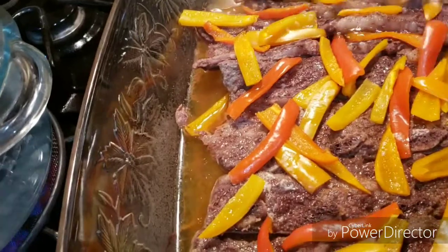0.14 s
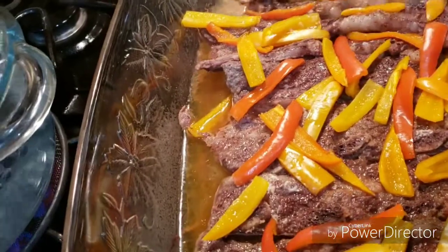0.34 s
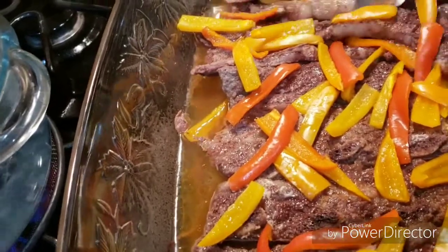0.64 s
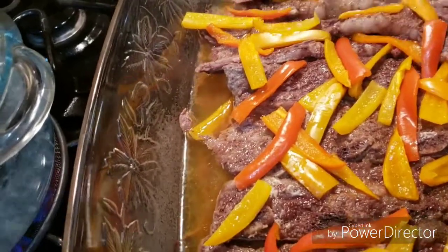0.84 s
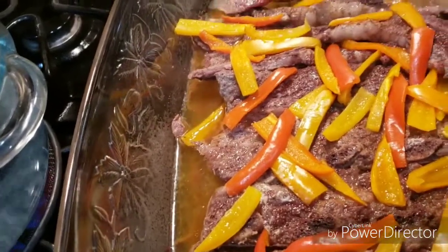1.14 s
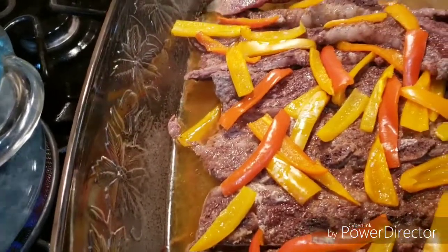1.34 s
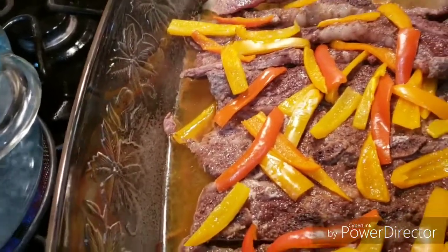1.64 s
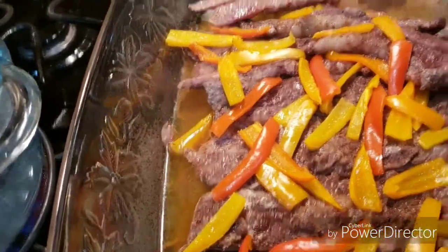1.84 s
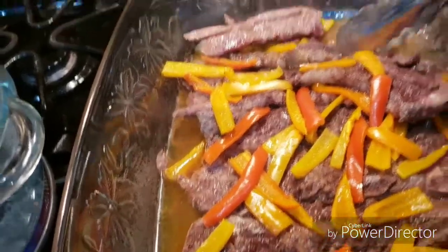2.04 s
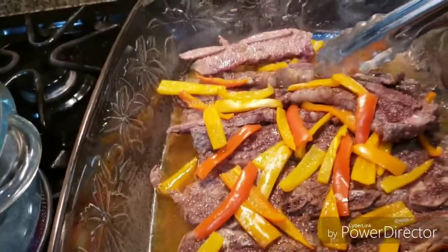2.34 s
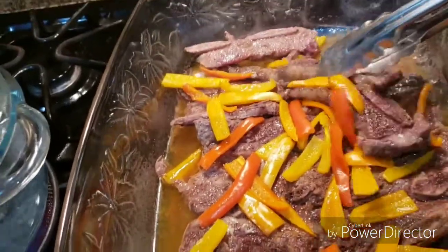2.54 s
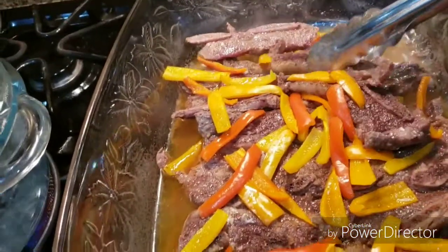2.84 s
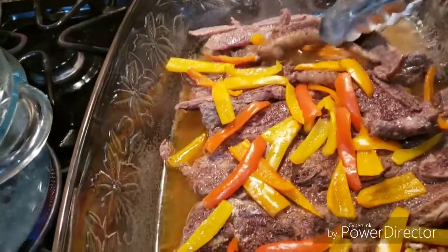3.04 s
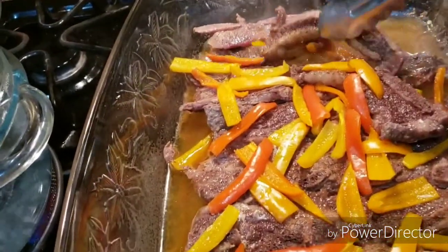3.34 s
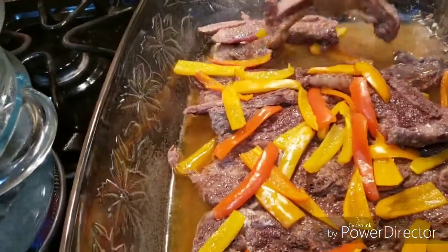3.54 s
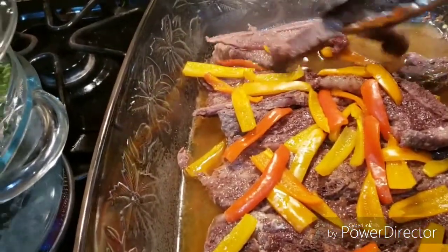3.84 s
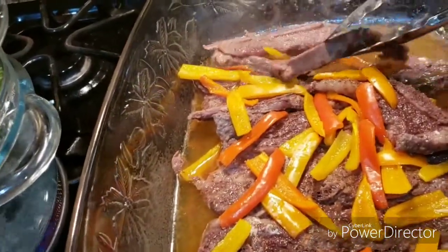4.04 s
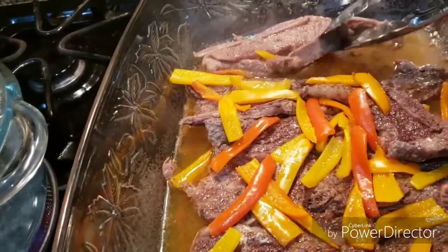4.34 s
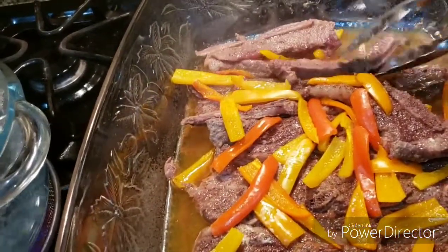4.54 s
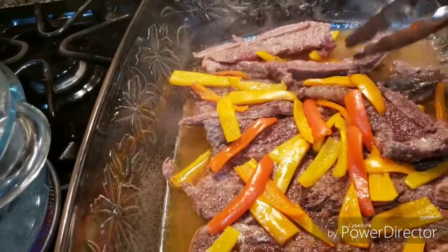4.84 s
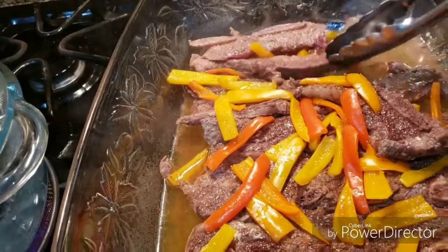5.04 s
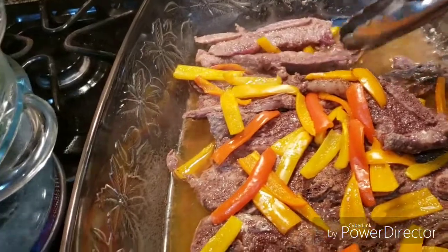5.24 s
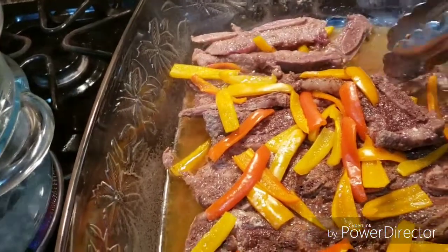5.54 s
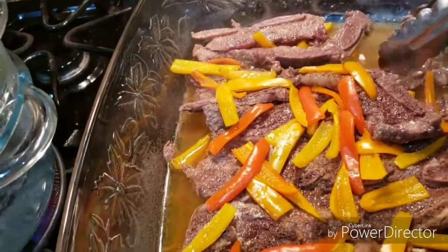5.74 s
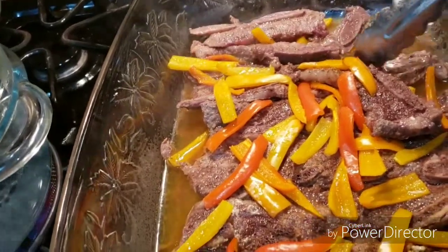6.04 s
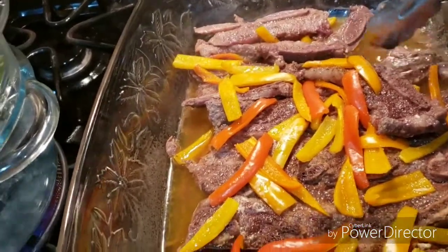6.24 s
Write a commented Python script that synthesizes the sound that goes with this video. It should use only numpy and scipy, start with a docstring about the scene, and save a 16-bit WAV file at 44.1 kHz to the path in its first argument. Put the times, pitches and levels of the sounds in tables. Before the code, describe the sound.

Steel tongs clink sharply on a glass baking dish while meat squishes in softly fizzing juice, over a low steady fan hum in a kitchen.

```python
"""Steel tongs knock and click on a glass baking dish of hot meat and peppers, on a kitchen stove.
The dish rings briefly, the tongs scrape along it, and the meat squishes in its softly fizzing juice.
An appliance fan hums throughout; a small kitchen answers each click.
Blows are noise bursts plus dying tones, scrapes and juice are many tiny pops of noise,
and the fan is wavering tones in coloured noise."""
import sys
import numpy as np
from scipy import signal
from scipy.fft import rfft, irfft
from scipy.io import wavfile
from scipy.ndimage import uniform_filter1d

SR = 44100
rng = np.random.default_rng(int(sys.argv[2]) if len(sys.argv) > 2 else 0)


def store_wav(level_fs):
    """Save 16-bit WAV to argv[1]."""
    pcm = np.round(np.clip(np.atleast_2d(level_fs), -1, 1) * 32767)
    wavfile.write(sys.argv[1], SR, pcm.T.astype(np.int16))


N = 281799
TIME, HZ = np.arange(N) / SR, np.fft.rfftfreq(N, 1 / SR)
RING = np.arange(SR // 2) / SR  # time since a blow [s]

# ringing tones of the glass dish: (pitch [Hz], relative level [dB], time to fall 60 dB [s])
GLASS_MODES = [(484, -10, .1), (700, -13, .09), (897, -5, .17), (985, -5, .07), (1180, -8, .04),
               (1290, -6, .05), (1545, -5, .045), (1830, -8, .06), (2035, -3, .06), (2325, 1, .07),
               (2488, -2.5, .09), (2867, 3.5, .085), (2920, 0, .08), (3070, -4, .07), (3256, -3, .045),
               (3460, -5, .06), (4440, -3, .05), (4724, -5, .09), (5150, -9, .05), (5495, -5.5, .11),
               (6140, -7, .05), (6745, -1, .06), (7280, -5, .06), (7450, -7, .08), (9630, -10, .06),
               (10400, -12, .06), (12000, -11, .06)]
# steady fizz of the hot juice: (time [s], level [dB])
FIZZ_LEVEL = [(0, -59.5), (1.05, -63.5), (2.2, -57.5), (3.3, -61), (3.8, -58.5), (6.39, -57)]


def amp(db):
    """Turns decibels into a gain."""
    return 10 ** (np.asarray(db) / 20)


def evened(x):
    """Scales a sound to an rms of 1 over all its channels."""
    return x / np.sqrt(np.mean(x ** 2) + 1e-20)


def unit(x):
    """Scales each channel to an energy of 1."""
    return x / np.sqrt(np.sum(x ** 2, -1, keepdims=True) + 1e-20)


def read(points, hz):
    """Reads a table of (pitch, value) along a logarithmic pitch scale."""
    f, value = np.transpose(points)
    return np.interp(np.log(hz + 1), np.log(f + 1), value)


def pan(db):
    """Left and right gains that differ by db; a positive value leans left."""
    return amp(np.array([[db], [-db]]) / 2)


def add(mix, start_s, sound):
    """Adds a sound into the mix at its start time, cut off at the end of the mix."""
    part = mix[:, max(round(start_s * SR), 0):][:, :sound.shape[1]]
    part += sound[:, :part.shape[1]]


def noise(colour, size, tilt_db=0):
    """Two unrelated channels of coloured noise; tilt is in dB per octave and stays flat below 500 Hz."""
    hz = np.fft.rfftfreq(size, 1 / SR)
    octaves = np.log2(np.maximum(hz, 500) / 1000)
    gain = amp(read(colour, hz) + tilt_db * octaves)
    white = rng.standard_normal((2, size))
    return evened(irfft(rfft(white) * gain, size))


def drift(rate_hz):
    """Slow random wandering with an rms of 1."""
    smooth = np.exp(-(HZ / rate_hz) ** 2)
    return evened(irfft(rfft(rng.standard_normal(N)) * smooth, N))


def crackle(colour, per_s, spread_db):
    """Tiny pops of uneven size, each a few milliseconds of dying noise."""
    size = amp(spread_db * np.minimum(rng.exponential(1, N), 4))
    size = size * (rng.random(N) < per_s / SR)
    decay = np.exp(-1 / (.0018 * SR))
    power = signal.lfilter([1], [1, -decay], size ** 2)
    return evened(noise(colour, N) * np.sqrt(power))


def patchy(x, depth_db, width_hz, hold_s):
    """Lets the colour of a sound shift at random, in patches of time and pitch."""
    hz, t, z = signal.stft(x, SR, nperseg=512)
    field = rng.standard_normal(z.shape[1:])
    for axis, size in enumerate([width_hz / hz[1], hold_s / t[1]]):
        size = max(round(size), 1)
        field = uniform_filter1d(field, size, axis)
        field = uniform_filter1d(field, size, axis)
    shifted = z * amp(depth_db * evened(field))
    return evened(signal.istft(shifted, SR, nperseg=512)[1][:, :N])


def stroke(start_s, length_s, db, attack_s, sag_db_per_s, t60_s):
    """Gain of a gesture that rises, sags while it is held, and dies away."""
    t = np.maximum(TIME - start_s, 0)
    release_db = 60 * np.maximum(t - length_s, 0) / t60_s
    return (1 - np.exp(-t / attack_s)) * amp(db - sag_db_per_s * t - release_db)


def ring(modes, tilt_db, favoured_hz=0, split=0):
    """Dying tones; the point of contact favours those near one pitch, and all vary from blow to blow."""
    tilt_from_hz, strike_spread_db = 810, 1.2
    favour_db, favour_width_hz = 11, 180
    hz, db, t60_s = np.transpose(modes)[:, :, None]
    db = db + tilt_db * np.log2(np.maximum(hz / tilt_from_hz, 1))
    db = db + strike_spread_db * rng.standard_normal(hz.shape)
    hz = hz * (1 + split * rng.choice([-1, 1], hz.shape))
    db = db + favour_db * np.exp(-((hz - favoured_hz) / favour_width_hz) ** 2)
    # each tone is a quarter turn apart in left and right, the leading side drawn at random: it sounds wide
    quarter_turn = np.array([1, -1])[:, None, None] * rng.choice([-1, 1], hz.shape) * np.pi / 4
    phase = 2 * np.pi * (hz * RING + rng.random(hz.shape)) + quarter_turn
    return unit((amp(db - 60 * RING / t60_s) * np.sin(phase)).sum(1))


def clinks():
    """Each contact sets off a dull clack and a ring in the glass, and a bright snap in both arms of the tongs."""
    # contacts: (time [s], dull clack of the dish [dB], bright snap of the tongs [dB], glass ring [dB],
    # tilt [dB per octave], left-right difference [dB], favoured pitch of the tongs [Hz])
    contacts = [(0.0308, -29, -13, -32, 0, 3, 6500), (0.3828, -6, -23, -6, 4.5, 0, 7260),
                (0.3877, -9.5, -18, -2.5, 0, -5, 12000), (0.4845, -15.5, -12.5, -11.5, 2, 3, 5820),
                (1.189, -39, -53, -23, -2, 4, 7000), (1.8472, -13.5, -33.5, -16.5, -4, 8, 5000),
                (2.0251, -10, 2, -12.5, 1.5, 1, 7100), (2.1675, -13.5, -4.5, -14.5, 2, 0.5, 5560),
                (2.3308, -24.5, -25, -25.5, -3.5, -2, 5600), (3.866, -30.5, -36, -31.5, 6.5, -2, 5600),
                (4.531, -36, -28.5, -27.5, -2, 7, 7000), (4.6265, -54, -26, -30, 5, 0, 7000),
                (4.7015, -46, -17.5, -43, 13, 5, 9900), (5.022, -25.5, -39, -22, -7.5, 13, 7000)]
    # ringing tones of the steel tongs: (pitch [Hz], relative level [dB], time to fall 60 dB [s])
    steel_modes = [(3100, -11, .05), (3340, -12, .05), (3655, -11, .05), (4090, -11, .05), (4480, -12, .05),
                   (5690, -5, .03), (5820, -4, .03), (5905, -4, .03), (6228, -5, .03), (6540, -7, .03),
                   (6805, -5, .03), (6998, -3, .035), (7190, 0, .035), (7467, -3, .04), (8091, -6, .035),
                   (8699, -5, .03), (9700, -10, .03), (10250, -9, .03), (11230, -1, .04), (11480, -3, .035),
                   (11780, -2, .035), (13921, -7, .035), (14395, 2, .035), (14750, 1, .035),
                   (15150, -1, .03)]
    # dense, quickly damped sound of the dish, then of the tongs: (pitch [Hz], relative level [dB per Hz])
    clack_colour = [(60, -50), (200, 4), (480, 9), (680, 3), (1000, -1), (1400, -1.5), (2300, 2),
                    (3100, -4.5), (3900, -1.5), (5500, -1), (7200, -2), (9000, -18), (12000, -16),
                    (15500, -32)]
    snap_colour = [(300, 12), (1500, -15), (2700, -28), (3400, -28), (4700, -17), (5700, 3), (7200, -4),
                   (8200, 9.5), (10000, 3), (11600, -5), (13200, 7), (14400, -4), (16000, 2.5)]
    # a blow cushioned by meat is duller and longer: this much downward tilt doubles its decay
    contact_t60_s, cushion_tilt_db = 0.049, 5
    clack_length = 2.3  # times as long as the snap
    steel_db = 4  # ring of the steel relative to its snap
    second_arm_s, second_arm_db = 0.0062, -7  # the other arm of the tongs lands just after the first
    dulling_db_per_db = 1  # each dB less in the ring of the glass tilts it down by this much per octave
    # each tone of the dish has a weaker twin this share of its pitch away, so the ring beats
    twin_split, twin_db = .011, -4
    out = np.zeros((2, N))
    for start_s, clack_db, snap_db, glass_db, tilt_db, side_db, favoured_hz in contacts:
        t60_s = contact_t60_s * 2 ** (-tilt_db / cushion_tilt_db)
        clack_fade = amp(-60 * RING / (t60_s * clack_length))
        clack = unit(noise(clack_colour, len(RING), tilt_db) * clack_fade)
        snap = unit(noise(snap_colour, len(RING), tilt_db) * amp(-60 * RING / t60_s))

        tongs = snap + amp(steel_db) * ring(steel_modes, tilt_db, favoured_hz)
        # the second arm swaps the two channels of the snap
        second_arm = snap[::-1] + amp(steel_db) * ring(steel_modes, tilt_db, favoured_hz)
        add(tongs, second_arm_s, amp(second_arm_db) * second_arm)

        dull_db = dulling_db_per_db * glass_db
        twin = ring(GLASS_MODES, dull_db, split=twin_split)
        glass = unit(ring(GLASS_MODES, dull_db) + amp(twin_db) * twin)

        blow = amp(clack_db) * clack
        blow = blow + amp(snap_db) * unit(tongs) * pan(side_db)
        blow = blow + amp(glass_db) * glass
        add(out, start_s, blow * (1 - np.exp(-RING / 0.0002)))  # soften the very first instant
    return out


def thumps():
    """The heavy dish rocks on the grate and settles with a soft, low note."""
    # rocks of the dish: (time [s], level [dB], pitch [Hz], time to fall 60 dB [s])
    rocks = [(0.403, -11, 199, 0.079), (2.03, -17, 210.5, 0.17)]
    out = np.zeros((2, N))
    for start_s, db, hz, t60_s in rocks:
        rise = (1 - np.exp(-RING / 0.012)) ** 2
        note = np.sin(2 * np.pi * hz * RING) * amp(-60 * RING / t60_s) * rise
        add(out, start_s, amp(db) * unit(note) * pan(0))
    return out


def scrapes():
    """Many small slips of steel on glass keep the dish faintly ringing."""
    # tongs dragging over the dish: (time [s], length [s], level before mixing [dB], attack [s])
    drags = [(0.29, 0.031, -53, .002), (0.431, 0.071, -52.5, 0.0033), (0.698, 0.13, -60, 0.0051),
             (2.201, 0.013, -52.5, .003), (4.343, 0.041, -65.5, .006), (6.099, 0.089, -52, 0.036)]
    # colour of the slips: (pitch [Hz], relative level [dB per Hz])
    rasp_colour = [(300, -11), (750, 13), (1200, 0.5), (1800, 7.5), (2400, -1), (3000, 2), (3700, 4.5),
                   (5400, -3), (8000, -25), (15000, -49)]
    sag_db_per_s, t60_s = 43, 0.47  # a stroke bites, eases off and dies away
    drag = sum(stroke(*row, sag_db_per_s, t60_s) for row in drags)
    slips = drag * crackle(rasp_colour, per_s=2200, spread_db=2.2)
    singing = signal.fftconvolve(slips, ring(GLASS_MODES, tilt_db=-2.5), axes=1)[:, :N]
    singing = np.std(slips) * evened(singing)  # as strong as the slips
    return amp(-3) * slips + amp(-3) * singing


def squishes():
    """Pressing the meat squeezes out bursts of tiny wet bubbles, over small squishes at random."""
    # wet squishes of meat: (time [s], level [dB], time to fall 60 dB [s])
    presses = [(0.003, -46.5, 0.63), (0.43, -53, 0.59), (0.705, -51, 0.47), (1.128, -57, 0.18),
               (1.291, -49, 0.22), (2.11, -44.5, 0.25), (2.511, -44.5, 0.13), (2.767, -51.5, 0.22),
               (2.945, -59, 0.82), (3.752, -50.5, 0.53), (3.865, -56, 0.17), (3.952, -49, 0.13),
               (4.055, -47, 0.3), (4.33, -56.5, 0.43), (4.412, -51, 0.12), (4.707, -50.5, 0.29),
               (4.786, -54.5, 0.78), (5.096, -51, 0.28), (5.695, -49.5, 0.38), (5.845, -49.5, 0.38),
               (5.94, -52.5, 0.59), (6.108, -46.5, 0.21), (6.235, -52, 0.1), (6.309, -48.5, 0.22),
               (6.34, -50.5, 0.2)]
    # colour of the squishes: (pitch [Hz], relative level [dB per Hz])
    wet_colour = [(800, -14), (2400, -16), (3400, -7), (4700, -7), (7000, 0), (9700, -2), (12000, 1),
                  (15000, 2)]
    # the small squishes, with their level relative to the fizz
    seep_per_s, seep_db, seep_spread_db, seep_t60_s = 14, -5, 5, 0.13
    seeps = amp(seep_db + seep_spread_db * rng.uniform(-1, 1, N))
    seeps = seeps * (rng.random(N) < seep_per_s / SR)
    heat = amp(np.interp(TIME, *np.transpose(FIZZ_LEVEL)))
    press = (heat * signal.fftconvolve(seeps, squeeze(seep_t60_s))[:N])[None]
    for start_s, db, t60_s in presses:
        add(press, start_s, amp(db) * squeeze(t60_s)[None])
    bubbles = crackle(wet_colour, per_s=3000, spread_db=2.5)
    return press * patchy(bubbles, depth_db=3, width_hz=700, hold_s=.06) * pan(1)


def squeeze(t60_s):
    """Gain of one squish: the juice takes a moment to well up, then falls."""
    return amp(-60 * RING / t60_s) * (1 - np.exp(-RING / 0.0029))


def spurt():
    """One spurt of sizzling juice: dense pops that rise fast and die away."""
    # the spurt: (time [s], length [s], level [dB])
    gesture = (0.021, 0.19, -43.5)
    # its colour: (pitch [Hz], relative level [dB per Hz])
    spurt_colour = [(500, -8), (1000, 5.5), (1300, -25), (1720, 3.5), (2500, -30), (3200, -2.5), (4200, -1),
                    (6500, 3), (9800, -3), (11500, -2), (15500, 1)]
    spitting = crackle(spurt_colour, per_s=1500, spread_db=2.6)
    spitting = patchy(spitting, depth_db=2.5, width_hz=400, hold_s=.03)
    return stroke(*gesture, attack_s=0.0062, sag_db_per_s=55, t60_s=0.16) * spitting


def pops():
    """Larger bubbles burst with a tiny tick each: short noise around one pitch."""
    # bursts: (time [s], level [dB], pitch [Hz])
    bursts = [(0.055, -20.5, 6000), (0.171, -26, 13500), (0.1753, -24.5, 5540), (0.189, -27, 6000),
              (0.198, -29, 7300), (0.662, -29, 13700), (0.809, -32, 4450), (0.973, -37.5, 8900),
              (2.567, -34.5, 7850)]
    t60_s = .016
    narrowness = 12 / .55  # fall away from the pitch [dB per octave squared]
    out = np.zeros((2, N))
    for start_s, db, hz in bursts:
        colour = [(f, -narrowness * np.log2(f / hz) ** 2) for f in np.geomspace(1000, 16000, 17)]
        tick = unit(noise(colour, len(RING)) * amp(-60 * RING / t60_s))
        add(out, start_s, amp(db) * tick)
    return out


def fizz():
    """Countless tiny bubbles fizz in the hot juice all the time, their strength drifting slowly."""
    # colour of the fizz: (pitch [Hz], relative level [dB per Hz])
    fizz_colour = [(1000, 0), (1500, -4.5), (1950, -0.5), (2450, -12), (3000, 1), (3500, -0.5),
                   (4200, -6.5), (5200, -6), (6200, 0), (7200, 3), (8300, -0.5), (9900, -3.5), (12200, 2),
                   (15000, 2.5)]
    heat = amp(np.interp(TIME, *np.transpose(FIZZ_LEVEL)))
    bubbles = amp(.5 * drift(2.5)) * crackle(fizz_colour, per_s=4200, spread_db=1.9)
    return heat * patchy(bubbles, depth_db=2.5, width_hz=350, hold_s=.05) * pan(3.7)


def fan():
    """Motor tones waver in the rush of air; the bass of the rush reaches both microphones alike."""
    # loudness of the fan: (time [s], level [dB])
    loudness = [(0, -3), (0.9, -3), (2.1, 0.47), (6.39, 1)]
    loud_db = np.interp(TIME, *np.transpose(loudness))
    # the tones stand in the room, so they change more than the rush as the microphone moves
    tone_swing = 1.7
    return amp(loud_db) * air_rush() + amp(tone_swing * loud_db) * motor_tones()


def motor_tones():
    """Steady motor tones whose strength and phase wander slowly."""
    # motor tones: (pitch [Hz], rms level before wavering and fan loudness [dB])
    hum = [(103, -63.5), (120, -49.5), (154.4, -61.5), (239.8, -67), (310, -75), (484, -68), (707, -74.5),
           (829, -76.5)]
    waver_db = 1.47
    wander = 0.27  # phase wander of a 120 Hz tone [radians rms]; it grows with pitch
    tones = np.zeros(N)
    for hz, db in hum:
        strength = amp(db + waver_db * drift(1.9))
        phase = 2 * np.pi * hz * TIME + wander * hz / 120 * drift(6.0)
        tones += strength * np.sin(phase)
    return np.sqrt(2) * tones * pan(-0.19)


def air_rush():
    """Coloured noise, lifted at the duct resonances and shared by both channels in the bass."""
    # colour of the rush: (pitch [Hz], relative level [dB per Hz])
    rush_colour = [(20, -49), (30, -6.5), (40, 1.5), (95, 3), (130, 5.5), (180, -5.5), (235, 1),
                   (390, -13.5), (520, -8.5), (650, -14.5), (1000, -15.5), (1300, -37.5), (2500, -40),
                   (8000, -83)]
    # duct resonances: (pitch [Hz], width [Hz], lift [dB])
    duct = [(322, 28, 3.2), (458, 83, 8.3)]
    # likeness of left and right: (pitch [Hz], likeness [0 to 1])
    likeness = [(60, 0.89), (130, 0.95), (290, 0.91), (640, 0.052), (1400, 0.032)]
    # left-right difference: (pitch [Hz], level [dB])
    balance = [(60, -4), (200, 1.5), (380, -5.5), (700, -2.5), (1300, 2)]
    a, b = rfft(rng.standard_normal((2, N)))
    same = np.clip(read(likeness, HZ), -1, 1)
    colour_db = read(rush_colour, HZ)
    for hz, width_hz, lift_db in duct:
        colour_db = colour_db + lift_db / (1 + (2 * (HZ - hz) / width_hz) ** 2)
    side = amp(read(balance, HZ) / 2)
    left = a * side
    right = (same * a + np.sqrt(1 - same ** 2) * b) / side
    rush = evened(irfft(np.array([left, right]) * amp(colour_db), N))
    return amp(-50) * patchy(rush, depth_db=1.5, width_hz=170, hold_s=.04)


def echoes(x):
    """The stove top and the wall behind it throw each blow straight back, with left and right swapped."""
    # first echoes: (left delay [s], right delay [s], relative level [dB])
    bounces = [(0.0062, 0.0067, 20), (0.0126, 0.0075, -23), (0.0165, 0.021, -4.5)]
    out = np.zeros((2, N))
    for left_s, right_s, db in bounces:
        add(out[:1], left_s, amp(db) * x[1:])
        add(out[1:], right_s, amp(db) * x[:1])
    return out


def kitchen(x):
    """The small room answers with a diffuse tail of noise that dies sooner in the treble."""
    # decay of the room: (pitch [Hz], time to fall 60 dB [s])
    room_decay = [(200, .4), (1000, .36), (4000, .27), (8000, .18), (15000, .15)]
    hz, t, z = signal.stft(rng.standard_normal((2, len(RING))), SR, nperseg=256)
    fade = amp(-60 * t / read(room_decay, hz)[:, None])
    tail = signal.istft(z * fade, SR, nperseg=256)[1][:, :len(RING)]
    tail = unit(tail * (1 - np.exp(-RING / 0.01)))  # the tail builds up gently
    return signal.fftconvolve(x, tail, axes=1)[:, :N]


def scene():
    """The dish and tongs in the room, over juice and fan."""
    blows, settling = clinks(), thumps()
    dish = blows + settling
    room = amp(-33.0) * echoes(blows) + amp(-15) * kitchen(dish)
    juice = squishes() + spurt() + pops() + fizz()
    return dish + room + scrapes() + juice + fan()


def record(dry):
    """The band limit of the recorder: a steep filter removes the highest treble."""
    edge_hz = 15600
    low_pass = signal.firwin(511, edge_hz, window=("kaiser", 9), fs=SR)
    return signal.oaconvolve(dry, low_pass[None], "same", axes=1)


dry = scene()
out = record(dry)
store_wav(out)
```